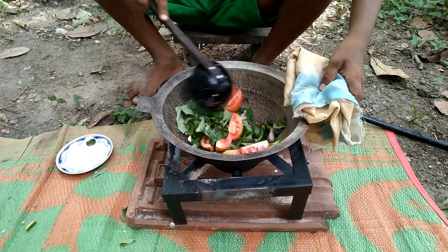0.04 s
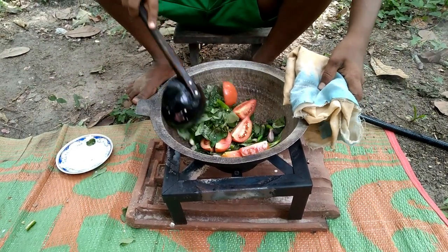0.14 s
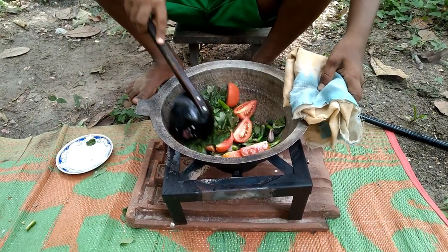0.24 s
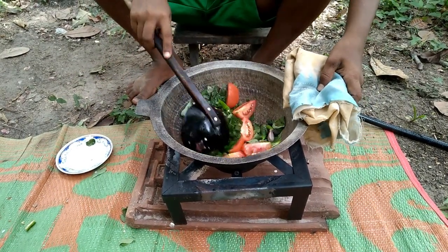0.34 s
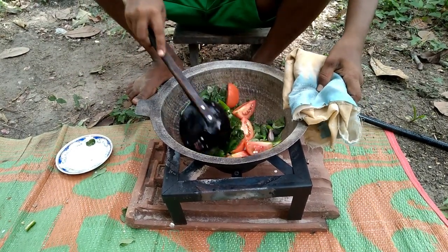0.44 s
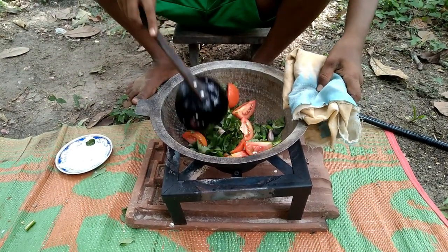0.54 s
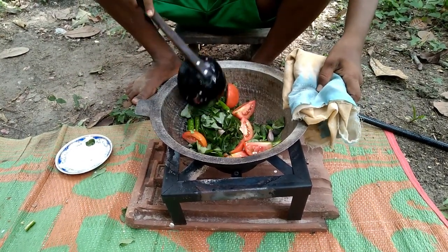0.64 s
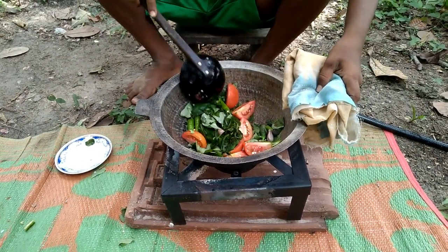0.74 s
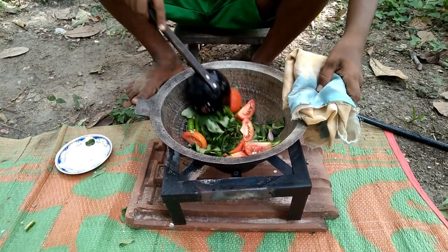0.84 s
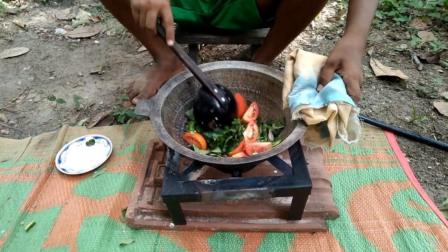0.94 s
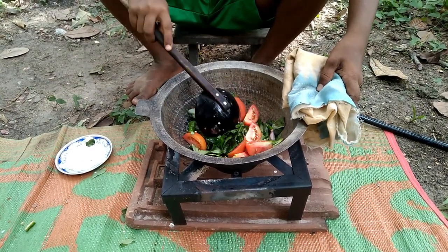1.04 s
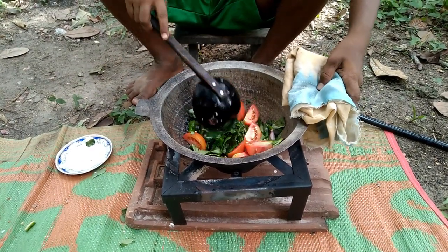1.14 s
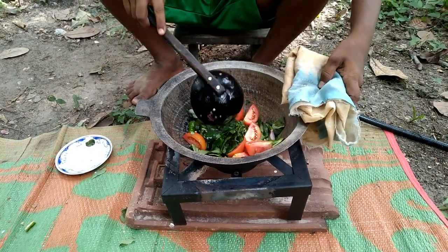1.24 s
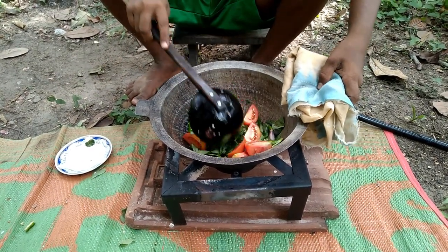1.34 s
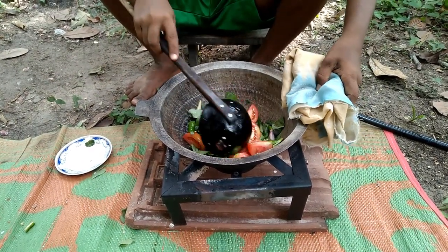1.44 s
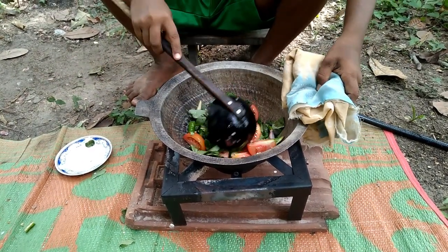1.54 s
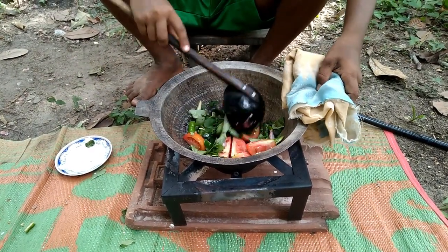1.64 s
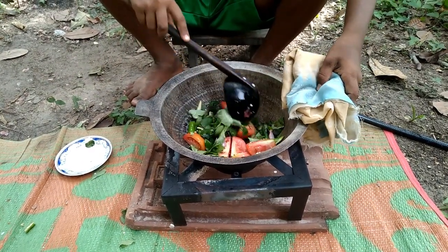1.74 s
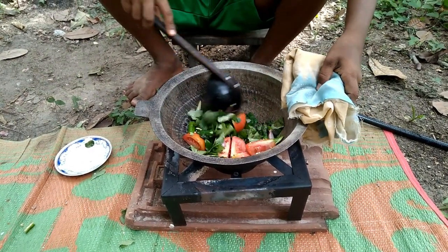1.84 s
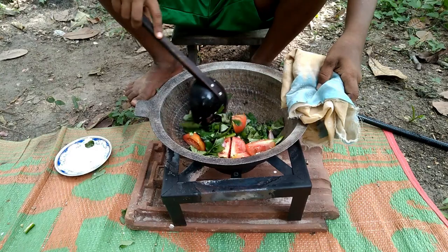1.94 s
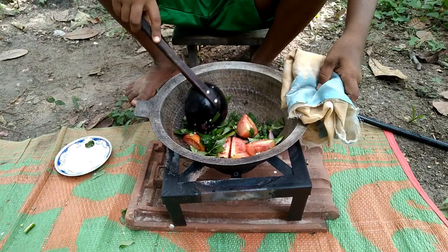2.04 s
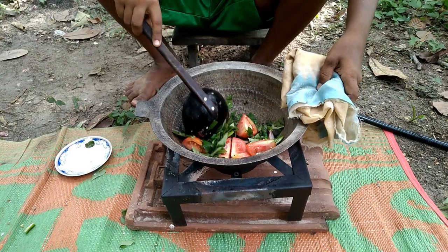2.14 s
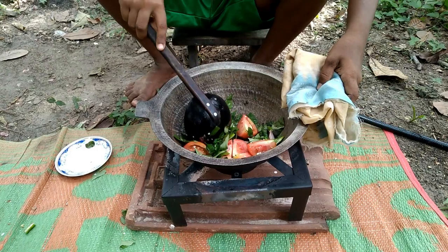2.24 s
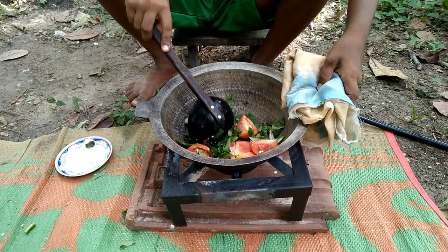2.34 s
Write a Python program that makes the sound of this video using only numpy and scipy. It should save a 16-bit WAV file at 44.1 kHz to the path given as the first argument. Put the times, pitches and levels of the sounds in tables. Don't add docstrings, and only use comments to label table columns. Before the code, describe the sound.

A ladle knocks a metal pan twice early with bright rings, then once later with a flat, dry clack; faint scraping and leaf rustle between, steady shrill crickets throughout, open yard, close microphone.

```python
import sys
import numpy as np
from scipy import signal
from scipy.fft import rfft, irfft
from scipy.io import wavfile
from scipy.ndimage import uniform_filter1d

SR = 44100
rng = np.random.default_rng(int(sys.argv[2]) if len(sys.argv) > 2 else 0)


def master_out(mix):
    frames = np.transpose(np.atleast_2d(mix))
    ceiling = np.clip(frames, -1, 1)
    pcm = np.round(ceiling * 32767).astype(np.int16)
    wavfile.write(sys.argv[1], SR, pcm)


def nominal_scale(level):
    x = np.asarray(level, float) / 20
    return 10 ** x


N = 105840

# pitch_hz, level_db (per Hz)
CHORUS_HAZE = [(5750, -43.5), (6250, -16), (6800, -6), (7400, -1.5), (7900, -19), (8400, -21.5),
               (8800, -43.5)]
# pitch_hz, level_db (per Hz)
YARD_AIR = [(250, -34), (550, -29.5), (950, -23.5), (1400, -37.5), (2200, -21), (2750, -22.5), (3600, -14),
            (5650, -14.5)]
# pitch_hz, level_db (per Hz)
HIGH_AIR = [(7500, -34), (9400, -0.5), (10300, -18), (11300, 0.5), (12300, -13.5), (15700, -14.5)]
# pitch_hz, level_db (per Hz)
GROUND_RUMBLE = [(25, -21.5), (70, 0), (150, -1), (240, -16), (400, -31)]
# start_s, scrape_db, rustle_db
STIRRING = [(0, -69, -59), (0.098, -78.5, -65.5), (.19, -82, -79), (0.232, -60.5, -56), (.38, -70.5, -62),
            (0.498, -74, -63), (0.748, -87.5, -65.5), (0.837, -61, -62), (1.051, -69.5, -62),
            (1.199, -80, -92), (1.641, -101, -80), (1.699, -68.5, -65.5), (1.799, -75.5, -77),
            (1.848, -62.5, -57), (1.96, -62.5, -54), (2.0, -70.5, -67.5), (2.151, -75, -103),
            (2.4, -73.5, -93)]
# pitch_hz, level_db (per Hz)
SCRAPE_COLOUR = [(350, -25), (550, -6), (900, -3), (1600, -7.5), (2300, -5), (3200, -17.5), (5000, -16),
                 (7000, -46)]
# pitch_hz, level_db (per Hz)
PAN_RUMBLE = [(90, -24), (200, -1), (400, 7.5), (800, -15.5), (1200, -29.5)]
# pitch_hz, level_db (per Hz)
LEAF_COLOUR = [(2000, -24), (4000, -5), (9500, 3), (10400, -11), (13000, -9.5), (15700, -9)]
# start_s (middle of first pulse), first_pulse_db, second_pulse_db
NEAR_CHIRPS = [(0.0201, -37.8, -39.2), (0.1033, -37.4, -42.2), (0.1845, -37.5, -33.6),
               (0.2707, -37.8, -39.5), (0.3518, -40.1, -37.8), (0.4325, -37.8, -36.6),
               (0.5139, -39.3, -37.5), (0.595, -37.2, -38.2), (0.6768, -38.0, -37.4), (0.758, -37.1, -38.4),
               (0.8398, -38.7, -40.2), (0.9339, -40.5, -40.1), (1.0174, -38.6, -37.1),
               (1.0975, -39.4, -41.2), (1.1788, -39.8, -42.1), (1.2572, -39.2, -40.2),
               (1.3385, -39.0, -41.0), (1.4171, -41.0, -37.0), (1.4988, -37.4, -38.0),
               (1.577, -35.5, -39.2), (1.6582, -36.4, -38.4), (1.7391, -38.2, -38.2), (1.821, -39.3, -38.3),
               (1.9015, -37.7, -37.6), (1.9824, -37.2, -37.5), (2.0628, -38.0, -37.7),
               (2.1447, -36.9, -36.9), (2.2264, -38.3, -40.7), (2.3085, -35.2, -36.0),
               (2.3912, -34.9, -46.0)]
# start_s, ring_db, crack_db, place (0, 1 or 2 on the pan)
LADLE_BLOWS = [(.2062, -27, -26, 0), (.8169, -25, -29, 1), (1.8268, -40, -27, 2), (1.9505, -57, -58, 1),
               (.2345, -36, -34, 0), (.2490, -52, -50, 0), (.2600, -56, -50, 0), (.2850, -70, -58, 0),
               (1.8400, -54, -52, 2), (1.9400, -66, -62, 2), (1.7110, -70, -62, 1), (.0190, -66, -62, 1),
               (.1050, -76, -58, 2)]
PAN_PITCHES = [946, 1010, 1820, -1858, -1864, 2848, 2928, 2955, 3149, 3262, 3412, 3553, 4107, 4220]
# fade_s (to -60 dB), place_0_db, place_1_db, place_2_db
PAN_RINGING = [(.4, -9, -6, -20), (.27, -3, -30, -15), (.46, -6, -16, -22), (.17, -40, 0, -12),
               (.44, -8, -18, -40), (.26, 3, -24, -11), (.2, -2, -26, -31), (.21, -2, -40, -26),
               (.35, -24, -21, -35), (.31, -20, -14, -43), (.37, -15, -13, -27), (.36, -14, -12, -32),
               (.21, -5, -22, -38), (.24, -8, -15, -25)]
LADLE_PITCHES = [390, 830, 1215, 1370, 1540, 3028, 3750, 4088, 4550, 5060, 5655, 6240, 2458, 10700]
# fade_s (to -60 dB), place_0_db, place_1_db, place_2_db
LADLE_RINGING = [(0.013, -32.5, -17.5, 6.5), (0.013, -34.5, -3, 13.5), (0.026, 4, 8, 2),
                 (0.015, -25, 11, -14), (0.02, 0, -12, 7.5), (0.02, -9.5, 6, -46), (.035, 0.5, -20, -48),
                 (0.095, -2.5, -25, -38), (0.022, 1, -8, -30), (0.017, 5, -18, -39), (0.062, -5, -24, -33),
                 (.02, -6, -12, 9), (0.47, -15, -32.5, -62), (0.0045, -59, -53.5, -4.5)]
# pitch_hz, level_db
CRACK_COLOUR = [(150, -36), (600, -8.5), (1300, -18.5), (2300, 8), (4800, 12.5), (9000, 0), (12000, -34.5),
                (16000, -25.5)]
# pitch_hz, level_db
FLAT_KNOCK_COLOUR = [(150, -10), (800, -6), (1800, -2), (2400, -41), (3200, -13), (5000, 0.5), (9000, 5),
                     (16000, -24.5)]
CRACK_TILT = [2, -0.5, 0]
CRACK_FADE = [.024, .022, .008]
# start_s, level_db, centre_hz,
# width_octaves, fade_s (to -60 dB)
SMALL_TICKS = [(0.2047, -49.5, 225, 0.46, 0.072), (0.8168, -56.5, 188, 1, 0.11),
               (1.8259, -44.5, 233, 0.86, 0.067), (.2150, -27.5, 5140, 0.45, 0.021),
               (.2230, -48, 5000, .3, 0.034), (0.241, -46, 5200, 0.49, 0.036),
               (0.248, -42, 1290, 0.33, 0.019), (0.255, -34, 1620, 0.6, 0.026),
               (.2680, -54, 5000, 0.36, .04), (0.279, -44, 4750, 0.52, 0.05),
               (.2950, -48, 900, 0.34, 0.029), (1.842, -45.5, 900, 0.48, 0.015),
               (1.8500, -45.5, 704, 0.74, 0.044), (1.8660, -48, 700, 0.88, 0.025),
               (1.893, -64, 800, .5, .02), (1.923, -54, 700, 1, 0.023), (1.935, -51, 800, 0.95, .02),
               (1.9397, -47.5, 880, 0.97, 0.023), (1.9465, -57, 940, .5, .012),
               (1.952, -43.5, 800, 1, 0.017), (1.9610, -60, 4570, 0.43, .03), (0.831, -56, 1450, .25, 0.08),
               (0.221, -41.5, 1103, .2, 0.25), (1.9300, -59.5, 946, 0.0051, 0.61),
               (1.8450, -56, 414, 0.19, 0.48), (2.2300, -65, 732, 0.35, 0.11),
               (2.2650, -64.5, 686, 0.11, 0.042), (2.3320, -64, 700, .4, 0.058),
               (2.3550, -65, 800, 0.39, .05), (1.6550, -63.5, 11500, .2, .03)]

CONTACT_RISE_S = 0.0006


def evened(x):
    return x / np.sqrt(np.mean(x ** 2) + 1e-20)


def colour(x, points):
    f, db = np.transpose(points)
    hz = np.fft.rfftfreq(len(x), 1 / SR)
    level = np.interp(np.log(hz + 1), np.log(f), db, left=-90, right=-90)
    return irfft(rfft(x) * nominal_scale(level), len(x))


def add(mix, s, sound):
    part = mix[round(s * SR):][:len(sound)]
    part += sound[:len(part)]


def clicks(per_s, spread_db):
    size = nominal_scale(spread_db * np.minimum(rng.exponential(1, N), 5))
    sign = rng.choice([-1., 1.], N)
    return size * sign * (rng.random(N) < per_s / SR)


def patchy(points, db, patchy_db):
    noise = colour(rng.standard_normal(N), points)
    _, _, z = signal.stft(noise, SR, nperseg=512)
    blurred = uniform_filter1d(rng.standard_normal(z.shape), size=3, axis=0)
    patches = evened(uniform_filter1d(blurred, size=24, axis=1))
    drifting = z * nominal_scale(patchy_db * np.clip(patches, -2, 1))
    return nominal_scale(db) * evened(signal.istft(drifting, SR, nperseg=512)[1][:N])


def wing_stroke(length_s, top_hz, end_hz, partials_db=0):
    u = np.arange(0, length_s, 1 / SR) / length_s
    turn = 2 * np.pi * np.cumsum(top_hz + (end_hz - top_hz) * u) / SR
    partials = nominal_scale(-30) * np.sin(turn / 2) + nominal_scale(-34) * np.sin(3 * turn / 2)
    swell = np.sin(np.pi * u) ** 2
    return swell * (np.sin(turn) + nominal_scale(partials_db) * partials)


def cricket_pulse(tune):
    out = np.zeros(SR // 50)
    add(out, 0, wing_stroke(0.0066, tune * 7700, tune * 7170))
    after = wing_stroke(0.0066, tune * 7474, tune * 6228, partials_db=-4.5)
    add(out, 0.0048, nominal_scale(-7) * after)
    return out


def far_chorus(count=10):
    pulses_per_s, detune = 1400, 0.043
    out = np.zeros(N)
    for tune in 1 + detune * np.linspace(-1.5, 1.5, count):
        starts = clicks(pulses_per_s / count, 0.6)
        out += signal.oaconvolve(starts, cricket_pulse(tune))[:N]
    return nominal_scale(-54.5) * evened(out) + patchy(CHORUS_HAZE, db=-51, patchy_db=4)


def open_air():
    air = patchy(YARD_AIR, db=-68.5, patchy_db=3) + patchy(HIGH_AIR, db=-80, patchy_db=4)
    return air + patchy(GROUND_RUMBLE, db=-79, patchy_db=2)


def stirring():
    s, scrape_db, rustle_db = np.transpose(STIRRING)
    t = np.arange(N) / SR
    slips = clicks(1200, 1.2)
    press_db = np.interp(t, s, scrape_db)
    scrape = nominal_scale(press_db) * evened(colour(slips, SCRAPE_COLOUR))
    rumble_db = -60 + 2.2 * (press_db - max(scrape_db))
    rumble = nominal_scale(rumble_db) * evened(colour(slips, PAN_RUMBLE))
    rustle = evened(colour(clicks(6900, 1.5), LEAF_COLOUR))
    return scrape + rumble + nominal_scale(np.interp(t, s, rustle_db)) * rustle


def yard_reflections(x):
    fade_s = 0.14
    t = np.arange(SR // 4) / SR
    tail = rng.standard_normal(len(t)) * nominal_scale(-60 * t / fade_s) * (t > .002)
    return nominal_scale(-19) * signal.fftconvolve(x, tail / np.linalg.norm(tail))[:N]


def near_cricket():
    half_pulse_s, pair_s, near_db = 0.0066 / 2, 0.0226, 2
    out = np.zeros(N)
    chance = rng.standard_normal((len(NEAR_CHIRPS), 3))
    for (s, first_db, second_db), (a, b, c) in zip(NEAR_CHIRPS, chance):
        start = s - half_pulse_s
        add(out, start, nominal_scale(first_db + near_db) * cricket_pulse(1 + 0.0039 * a))
        second = start + pair_s + 0.00013 * c
        add(out, second, nominal_scale(second_db + near_db) * cricket_pulse(1 + 0.0032 * b))
    return out


def crack(noise, place):
    u = np.arange(len(noise)) / SR
    tilted = [(f, d + CRACK_TILT[place] * np.log2(f / 3000)) for f, d in CRACK_COLOUR]
    points = FLAT_KNOCK_COLOUR if place == 2 else tilted
    clatter = nominal_scale(-9 - 60 * u / 0.078)
    fall = nominal_scale(-60 * u / CRACK_FADE[place]) + clatter
    return evened(colour(noise, points)) * fall * np.minimum(u / CONTACT_RISE_S, 1)


def swelling_ring():
    t = np.arange(SR * 3 // 4) / SR
    rise_s, fade_s = 0.26, 0.6
    swell = (1 - np.exp(-(t / rise_s) ** 3)) * nominal_scale(-29 - 60 * t / fade_s)
    return swell * np.sin(2 * np.pi * 2462 * t)


def knocks():
    out, t = np.zeros(N), np.arange(SR * 3 // 4) / SR
    modes = np.vstack([PAN_RINGING, LADLE_RINGING])
    hz = np.concatenate([PAN_PITCHES, LADLE_PITCHES])[:, None]
    hiss = rng.standard_normal((len(LADLE_BLOWS), SR // 4))
    for (s, db, crack_db, place), noise in zip(LADLE_BLOWS, hiss):
        level = modes[:, 1 + place, None] - 60 * t / modes[:, :1]
        ring = (nominal_scale(level) * np.sin(2 * np.pi * hz * t)).sum(0)
        add(out, s, nominal_scale(db) * ring * np.minimum(t / 0.0008, 1))
        add(out, s, nominal_scale(crack_db) * crack(noise, place))
    add(out, 0.18, swelling_ring())
    return signal.sosfilt(signal.butter(2, [130, 15500], "bandpass", fs=SR, output="sos"), out)


def ticks():
    out, u = np.zeros(N), np.arange(SR // 3) / SR
    hiss = rng.standard_normal((len(SMALL_TICKS), len(u)))
    for (s, db, hz, octaves, fade_s), noise in zip(SMALL_TICKS, hiss):
        near, far = 2 ** octaves, 2 ** (1.5 * octaves)
        band = [(hz / far, -30), (hz / near, -6), (hz, 0), (hz * near, -6), (hz * far, -30)]
        fall = nominal_scale(db - 60 * u / fade_s)
        add(out, s, evened(colour(noise, band)) * fall * np.minimum(u / CONTACT_RISE_S, 1))
    return signal.sosfilt(signal.butter(2, 110, "highpass", fs=SR, output="sos"), out)


def far_hum():
    hz, width_hz, length_s = 900, 40, 0.2
    out, u = np.zeros(N), np.linspace(0, 1, round(length_s * SR))
    band = [(hz - 2 * width_hz, -25), (hz, 0), (hz + 2 * width_hz, -25)]
    swell = abs(np.sin(np.pi * u ** .5)) ** .5
    add(out, 1.335, nominal_scale(-83) * evened(colour(rng.standard_normal(len(u)), band)) * swell)
    return out


def snap():
    width_s = 0.0002
    out, u = np.zeros(N), np.arange(0, 12, 1 / (width_s * SR))
    add(out, 1.8271, -nominal_scale(-24) * (1 - u / 2) * u * np.exp(1 - u))
    return out


def scene():
    close = stirring() + near_cricket() + knocks() + ticks() + snap()
    distant = far_chorus() + open_air() + far_hum()
    return (close + yard_reflections(close) + distant)[None]


def top_cut(x):
    return signal.sosfilt(signal.butter(12, 16460, fs=SR, output="sos"), x)


def record(dry):
    return top_cut(dry)


dry = scene()
out = record(dry)
master_out(out)
```